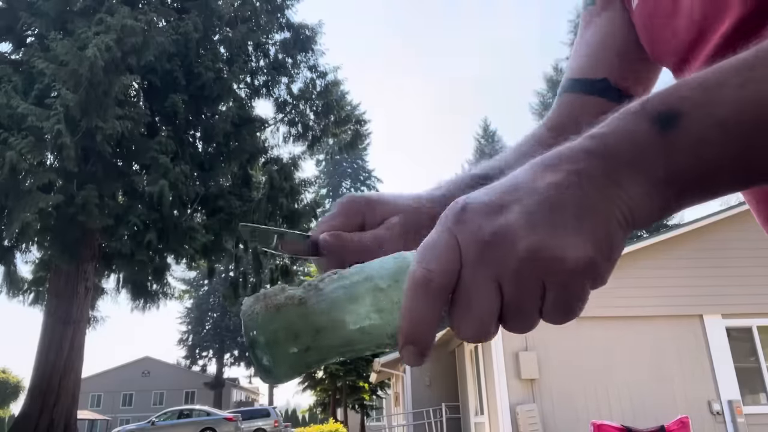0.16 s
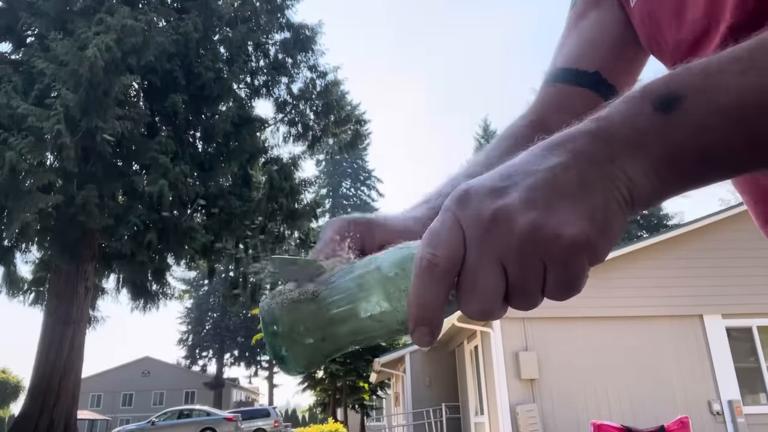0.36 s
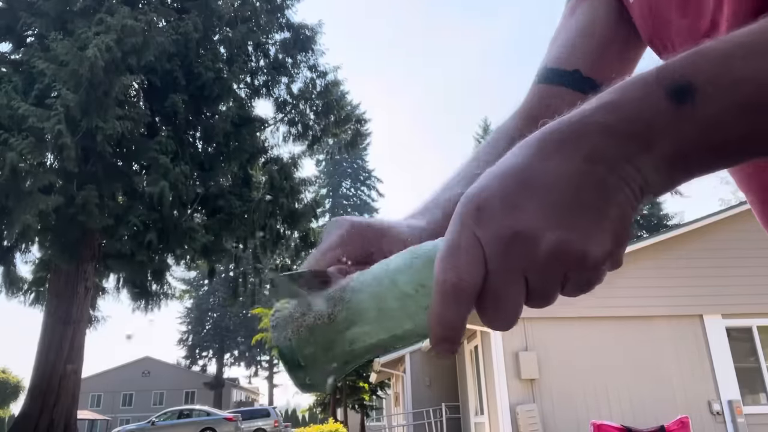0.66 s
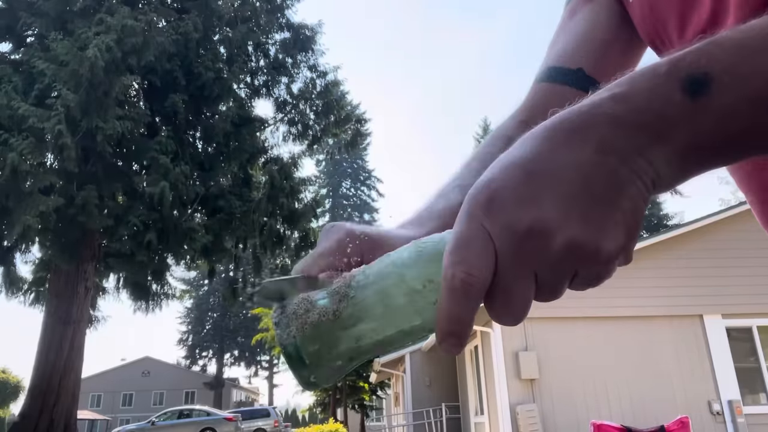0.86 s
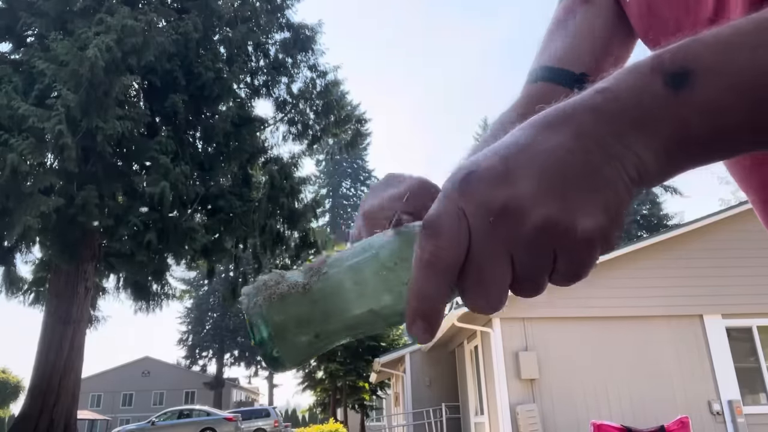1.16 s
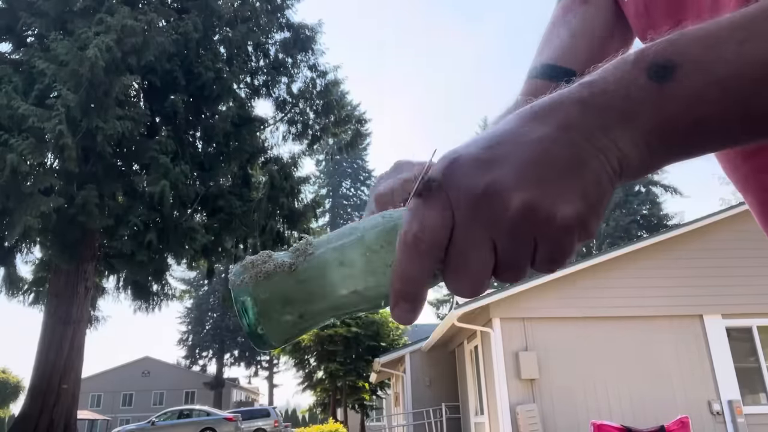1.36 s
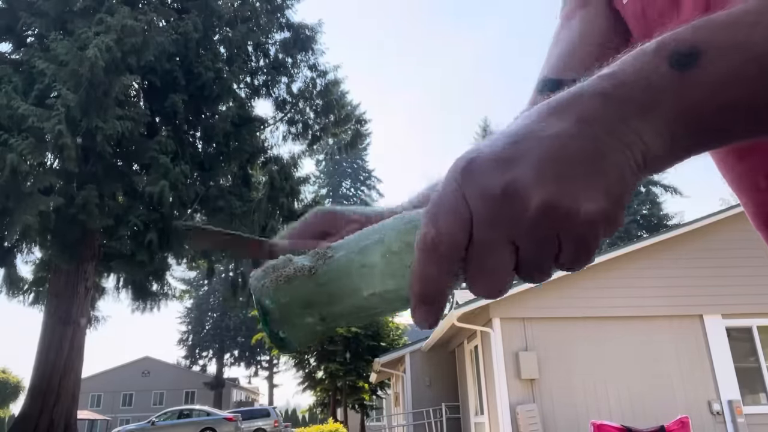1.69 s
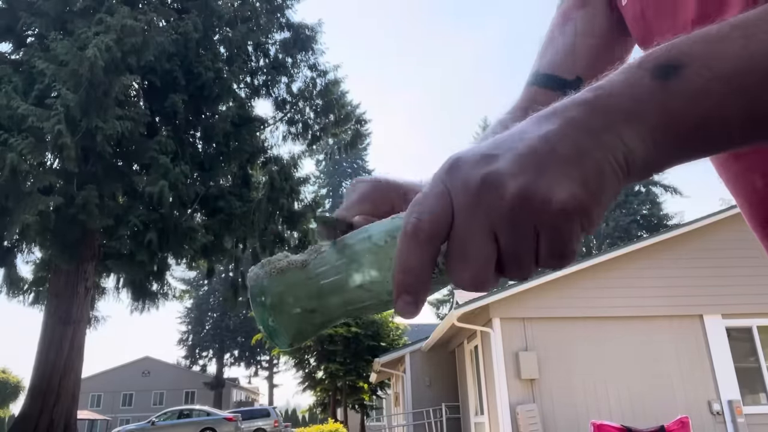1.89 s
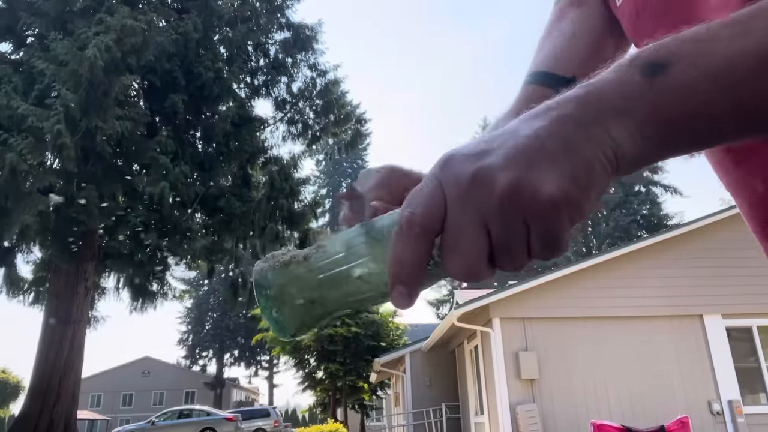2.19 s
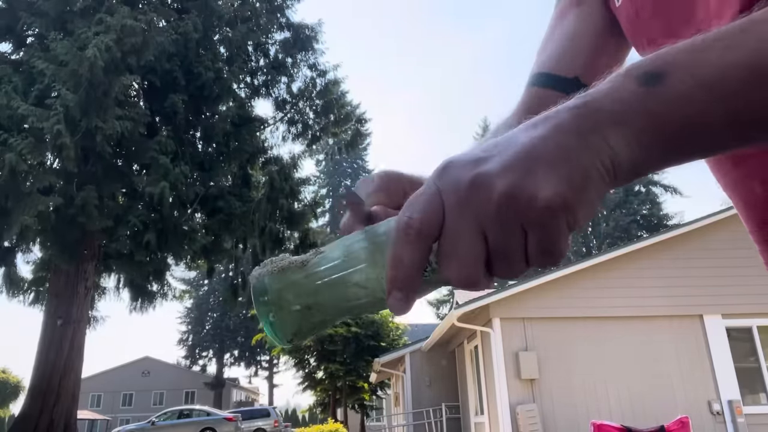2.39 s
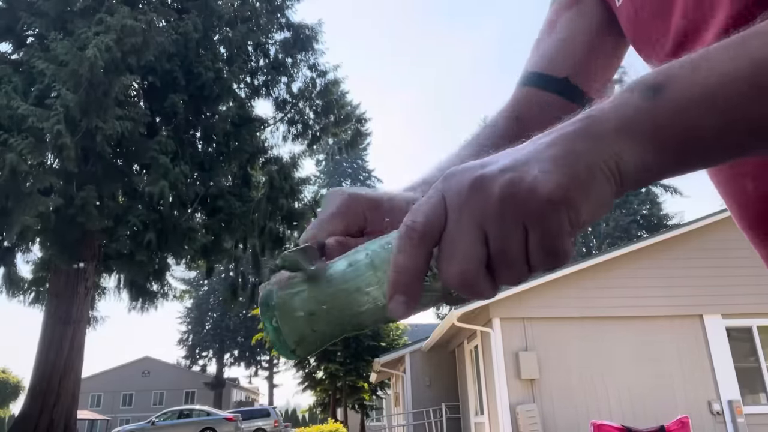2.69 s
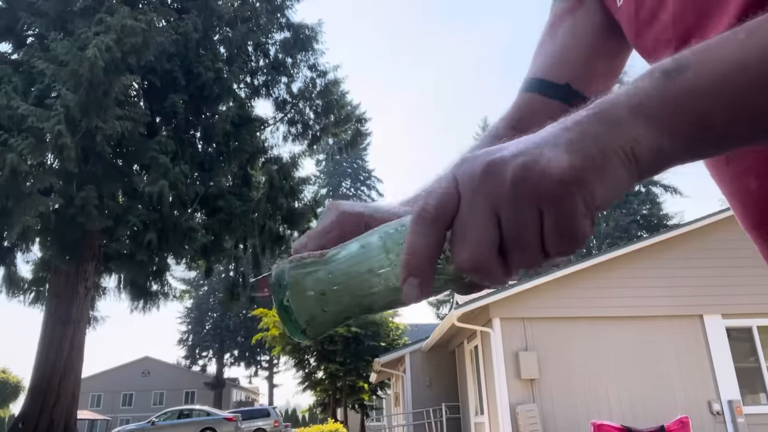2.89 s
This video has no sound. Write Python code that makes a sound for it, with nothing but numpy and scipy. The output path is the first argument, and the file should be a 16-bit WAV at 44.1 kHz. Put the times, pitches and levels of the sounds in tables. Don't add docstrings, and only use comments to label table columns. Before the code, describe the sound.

A metal butter knife scrapes hard crust off a glass bottle in quick, irregular strokes outdoors.

```python
import sys
import numpy as np
from scipy import signal
from scipy.fft import rfft, irfft, next_fast_len
from scipy.io import wavfile

SR = 44100
rng = np.random.default_rng(int(sys.argv[2]) if len(sys.argv) > 2 else 0)


def elevation(decibels):
    levels = np.asarray(decibels, float)
    return 10 ** (levels / 20)


def dump_mix(stems):
    frames = np.atleast_2d(stems).T
    limited = np.clip(frames, -1, 1)
    pcm = np.round(limited * 32767).astype(np.int16)
    wavfile.write(sys.argv[1], SR, pcm)


N = 134505


def in_hz(rows, hz, column=1):
    rows = np.array(rows)
    return np.interp(np.log(hz), np.log(rows[:, 0]), rows[:, column])


def rms_one(x):
    return x / np.sqrt(np.mean(x ** 2) + 1e-20)


def drift(rate_hz):
    settle = 20000
    pole = np.exp(-2 * np.pi * rate_hz / SR)
    slow = signal.lfilter([1], [1, -2 * pole, pole ** 2], rng.standard_normal(N + settle))
    return rms_one(slow[settle:])


def ring(x, hz, t60_s):
    radius = elevation(-60 / (t60_s * SR))
    angle = 2 * np.pi * hz / SR
    return signal.lfilter([0, np.sin(angle)], [1, -2 * radius * np.cos(angle), radius ** 2], x + 1e-18)


def bodies(damping):
    # hz [Hz], level_db [dB], t60_s [s]
    modes = [(2291, -32.5, 0.27), (2498, -25, 0.17), (2796, -20, 0.062), (3430, -20, 0.071),
             (3707, -21, 0.14), (5140, -16.5, 0.077), (6600, -32.5, 0.034), (7310, -4.5, 0.078),
             (7474, -10.5, 0.016), (8067, -5, 0.02), (10250, -4, 0.017), (10600, -56, 0.0067),
             (12700, -9.5, 0.024), (13600, -9.5, 0.02)]
    # hz [Hz], density_db [dB per Hz]
    crust = [(710, -55.5), (1200, -5), (3510, -36.5), (6300, 16), (7100, -6), (8910, -7.5), (10500, -10),
             (14400, -9), (16000, -42)]
    crust_db, crust_cycles = -6, 30.8
    hz = np.geomspace(950, 14500, 26)
    crust_gain = elevation(crust_db + in_hz(crust, hz)) * hz / 8000
    crust_rows = np.c_[hz, crust_gain, crust_cycles / hz]
    mode_rows = [(f, elevation(db), t60_s * damping) for f, db, t60_s in modes]
    return np.array(mode_rows + list(crust_rows))


def grit(per_s):
    spread_db = 1.8
    sizes = elevation(spread_db * np.minimum(rng.exponential(1, N), 4)) * rng.choice([-1, 1], N)
    return rms_one(sizes * (rng.random(N) < per_s / SR))


def struck(rows, shapes, lean_db, clicks, colour_db):
    wander_db, wander_s = 7.0, .014
    low_edge_hz, high_edge_hz = 2530, 14480
    colour = elevation(colour_db * rng.standard_normal((len(shapes), len(rows))) + lean_db)
    power = rows[:, 1] ** 2 * rows[:, 2]
    colour /= np.sqrt(colour ** 2 @ power / power.sum())[:, None]
    out = 0
    steps = np.arange(N) / SR / wander_s
    for strength, (hz, gain, t60_s) in zip(colour.T @ shapes, rows):
        points = np.minimum(rng.standard_normal(400), .8)
        wander = elevation(wander_db * np.interp(steps, np.arange(400), points))
        uneven_clicks = clicks * (1 + 1.303 * rng.standard_normal(N))
        out = out + ring(gain * strength * wander * uneven_clicks, hz, t60_s)
    out = signal.sosfilt(signal.butter(2, low_edge_hz, "high", fs=SR, output="sos"), out)
    return signal.sosfilt(signal.cheby1(8, 1, high_edge_hz, fs=SR, output="sos"), out)


def scrape():
    # start_s [s], length_s [s], level_db [dB], peak_share [0-1 of length], bright_db [dB per octave]
    strokes_before = [(-.03, 0.05, -38.5, 0.04, -33), (0.064, 0.024, -49.5, 0.4, 4.5),
                      (0.265, 0.043, -31, 0.72, -7.5), (0.31, 0.017, -31.5, 0.67, -7.5),
                      (0.513, 0.08, -31, 0, -10), (0.58, 0.017, -52, 0, 4), (0.746, 0.045, -29.5, 0.96, -9),
                      (0.795, 0.065, -30, 0, -4.5), (0.863, 0.04, -48, 0.2, -4),
                      (0.93, 0.039, -31.5, 0.37, -10), (0.972, 0.075, -41, 0.26, -13),
                      (1.072, 0.038, -31, 0.82, -1.5), (1.111, 0.04, -35.5, 0.23, -11.5),
                      (1.16, 0.059, -33, 0.44, -4.5), (1.223, 0.078, -39.5, 1, 0.5),
                      (1.301, 0.054, -32, 0.18, -9), (1.36, 0.056, -26, 0.83, -14),
                      (1.424, 0.016, -25.5, 0.26, 3.5), (1.442, 0.039, -42.5, 0.3, -8),
                      (1.528, 0.053, -41, 0.7, -4)]
    strokes_after = [(1.844, 0.051, -32.5, 0.74, -6), (1.919, 0.052, -39.5, 0.46, 8),
                     (1.964, 0.048, -27.5, 0.04, -16.5), (2.02, 0.076, -29.5, 0, -8),
                     (2.069, 0.026, -24.5, 0.95, -5), (2.125, 0.087, -34, 0.48, -4),
                     (2.227, 0.074, -31.5, 0.4, 0.5), (2.315, 0.046, -36.5, 0.94, 1),
                     (2.353, 0.047, -32.5, 0.78, -8), (2.375, 0.22, -48.5, 0.16, -26),
                     (2.425, 0.055, -35.5, 0.5, -1), (2.528, 0.089, -25.5, 0.4, -5),
                     (2.627, 0.062, -35, 0.8, 3), (2.684, 0.023, -30, 0.1, -4),
                     (2.827, 0.057, -48.5, 0.68, -12)]
    scrape_db, swell_power = -16, 0.87
    grit_per_s, judder_db, judder_hz = 7000, 3.2, 90
    strokes = np.transpose(strokes_before + strokes_after)[:, :, None]
    start_s, length_s, level_db, peak_share, bright_db = strokes
    progress = (np.arange(N) / SR - start_s) / length_s
    peak_share = np.clip(peak_share, .05, .95)
    swell = np.clip(np.minimum(progress / peak_share, (1 - progress) / (1 - peak_share)), 0, 1)
    shapes = elevation(level_db + scrape_db) * np.sin(np.pi / 2 * swell) ** swell_power
    rows = bodies(damping=.3)
    octaves = np.maximum(np.log2(rows[:, 0] / 8000), -1.3)
    lean_db = np.clip(bright_db, -14, 14) * octaves
    clicks = grit(grit_per_s) * elevation(judder_db * drift(judder_hz))
    return struck(rows, shapes, lean_db, clicks, colour_db=3.0)


def knocks():
    # [dB, weight of low body]
    catches_before = [(0.2256, -4, 6980, 0.046, 10), (0.2929, -10.5, 7190, 0.041, 7),
                      (0.3286, -7, 7590, 0.03, -15), (0.5055, -4, 7420, 0.018, 12),
                      (0.5478, -21.5, 10750, 0.0097, -7), (0.5823, -5, 8440, 0.022, 4.5),
                      (0.5983, -21.5, 10400, 0.016, -6), (0.7223, -10.5, 8570, 0.031, 9),
                      (0.7761, -27.5, 7340, 0.02, -1), (0.7814, -13, 7300, 0.016, -2),
                      (0.7897, -15.5, 10500, 0.011, 12), (0.8032, -1, 8330, 0.018, 2),
                      (0.813, -18.5, 10600, 0.02, 5), (0.8407, -23.5, 10560, 0.02, -1),
                      (0.874, -23.5, 10600, 0.018, 2), (0.9375, -27, 10800, 0.017, 11),
                      (0.942, -11.5, 7310, 0.029, 6), (1.0005, -15, 7400, 0.022, -11),
                      (1.0156, -32, 10200, 0.033, -6), (1.087, -23, 9900, 0.02, 25),
                      (1.1217, -4.5, 7300, 0.0089, -2), (1.1823, -15, 12050, 0.02, 7),
                      (1.1917, -6, 7430, 0.025, -3), (1.3048, -11, 7400, 0.019, 3.5),
                      (1.3823, -12, 10470, 0.027, 1.5), (1.3935, -5.5, 7700, 0.021, -6),
                      (1.4016, -7.5, 10400, 0.031, -2), (1.4166, -3, 10060, 0.011, 0),
                      (1.4348, -20, 12000, 0.028, 7)]
    catches_after = [(1.7793, -5.5, 7230, 0.02, -13), (1.7863, -11.5, 11340, 0.047, 3.0),
                     (1.8077, -14, 8550, 0.047, 7.5), (1.8738, -14, 7290, 0.02, -4),
                     (1.95, -19, 7900, 0.02, 19), (1.9668, -11, 8040, 0.013, 1),
                     (2.032, -10, 7790, 0.027, 15), (2.0408, -8.5, 7800, 0.016, 18),
                     (2.0841, -7.5, 9540, 0.02, -10), (2.2448, -16.5, 8070, 0.02, -2),
                     (2.2715, -27, 12300, 0.01, -13), (2.2791, -13.5, 10100, 0.009, -18),
                     (2.3378, -15.5, 11850, 0.028, 4.5), (2.3478, -15.5, 7390, 0.026, 15),
                     (2.3825, -6.5, 7670, 0.01, -33), (2.464, -20.5, 12200, 0.028, -7),
                     (2.4775, -14, 10040, 0.0078, 5), (2.4847, -16.5, 10400, 0.016, 8),
                     (2.54, -18, 10500, 0.014, 4), (2.5506, -15.5, 12200, 0.032, -8),
                     (2.6989, -10.5, 12100, 0.03, 3.5), (2.7642, -12.5, 14200, 0.032, 11.5)]
    knock_db, rise_s, hold_s = -24.5, 0.00047, 0.002
    focus_db, focus_octaves, body_below_hz = 15, 0.092, 6300
    catches = np.transpose(catches_before + catches_after)[:, :, None]
    start_s, peak_db, pitch_hz, t60_s, body_db = catches
    age_s = np.clip(np.arange(N) / SR - start_s, 0, .3)
    fall_db = 60 * np.maximum(age_s - hold_s, 0) / np.maximum(t60_s, .004)
    shapes = elevation(peak_db + knock_db - fall_db) * (1 - np.exp(-age_s / rise_s))
    rows = bodies(damping=.45)
    hz = rows[:, 0]
    lean_db = focus_db * np.exp(-(np.log2(hz / pitch_hz) / focus_octaves) ** 2)
    lean_db = lean_db + body_db / (1 + (hz / body_below_hz) ** 8)
    return struck(rows, shapes, lean_db, grit(24000), colour_db=2.0)


def yard(x):
    level_db, t60_s, delay_s, width, dull_hz = -23, 0.13, 0.002, .25, 5560
    age_s = np.arange(SR // 2) / SR - delay_s
    tail = rng.standard_normal((2, SR // 2)) * elevation(-60 * age_s / t60_s) * np.clip(age_s / delay_s, 0, 1)
    tail = tail[0] + width * tail[1] * [[1], [-1]]
    tail = signal.lfilter(*signal.butter(1, dull_hz, fs=SR), tail)
    tail = tail / np.sqrt(np.sum(tail ** 2) / 2)
    return x + elevation(level_db) * signal.fftconvolve(x[None], tail, axes=1)[:, :N]


def ports(x):
    # hz [Hz], right_lead_rad [rad], left_minus_right_db [dB]
    port_rows = [(1000, .5, -1.5), (2400, 1.6, .5), (4200, 2.3, -1.5), (6100, 3.14, -.1), (7300, 2.7, -5.0),
                 (9300, 1.8, -.8), (11800, .1, 0.1), (15000, -.9, 0.1)]
    sway_rad, sway_hz, sway_below_hz = .36, 7, 5300
    hz = np.maximum(np.arange(N // 2 + 1) * SR / N, 1)
    half = np.exp(-.5j * in_hz(port_rows, hz)) * elevation(in_hz(port_rows, hz, column=2) / 2)
    pair = rfft(yard(x)) * np.array([half, 1 / half])
    low = 1 / (1 + (hz / sway_below_hz) ** 12)
    sway = np.exp(1j * sway_rad * drift(sway_hz) * [[1], [-1]])
    low_analytic = signal.hilbert(irfft(pair * low, N), next_fast_len(N))[:, :N]
    return irfft(pair * (1 - low), N) + np.real(low_analytic * sway)


def traffic():
    # hz [Hz], density_db [dB per Hz]
    spectrum = [(15, -51), (25, -18), (49, -1), (146, -6.5), (172, -13), (250, -12.5), (978, -5),
                (1630, -22), (15000, -52.5)]
    # time_s [s], level_db [dB]
    level_rows = [(0, -47), (.12, -40.5), (0.329, -45), (0.369, -59.5), (.43, -61.5), (0.502, -46),
                  (0.599, -50), (.65, -46.5), (0.749, -44.5), (1.501, -47), (2.2, -46), (3.05, -46.5)]
    # hz [Hz], width_hz [Hz], level_db [dB]
    engines = [(72.6, 23.3, -52), (102.3, 46, -53.5), (217, 34, -60.5), (378.9, 16, -67.5)]
    # hz [Hz], correlation [-1 to 1]
    likeness = [(40, 0.52), (90, 0.67), (180, 1), (350, -0.26), (700, -0.19), (2000, -0.17), (15000, -0.37)]
    # hz [Hz], left_minus_right_db [dB]
    balance = [(60, -1), (180, -12), (550, -3), (1650, -2.5), (4970, 1.5), (15000, -2)]
    patch_db, patch_hz = 2.65, 11
    out = 0
    edges_hz = 20 * 2 ** np.arange(0, 9.9, .5)
    white = rng.standard_normal((2, 2, N))
    for k, (low_hz, high_hz) in enumerate(zip(edges_hz, edges_hz[1:])):
        band = signal.butter(2, [low_hz, high_hz], "band", fs=SR, output="sos")
        mid, side = signal.sosfilt(band, white[k % 2])
        hz = np.sqrt(low_hz * high_hz)
        alike = np.clip(in_hz(likeness, hz), -1, 1)
        pan_db = in_hz(balance, hz) * np.array([[.5], [-.5]])
        gain = elevation(in_hz(spectrum, hz) + patch_db * drift(patch_hz) + pan_db)
        out = out + gain * (np.sqrt(1 + alike) * mid + np.sqrt(1 - alike) * side * [[1], [-1]])
    out = elevation(-45) * rms_one(out)
    for hz, width_hz, db in engines:
        t60_s = 2.4 / width_hz
        tone = rms_one(ring(ring(rng.standard_normal(N), hz, t60_s), hz, t60_s))
        out = out + elevation(db + np.array([[-1.8], [1.8]])) * tone
    time_s, level_db = np.transpose(level_rows)
    return out * elevation(np.interp(np.arange(N) / SR, time_s, level_db) + 47.5)


def scene():
    return ports(scrape() + knocks()) + traffic()


def roll_off(x):
    return signal.sosfilt(signal.butter(12, 16480, fs=SR, output="sos"), x)


def record(dry):
    limit = 0.86
    rounded = limit * np.tanh(dry / limit)
    mix = signal.sosfilt(signal.cheby2(10, 60, 16500, fs=SR, output="sos"), rounded)
    return roll_off(mix)


dry = scene()
out = record(dry)
dump_mix(out)
```